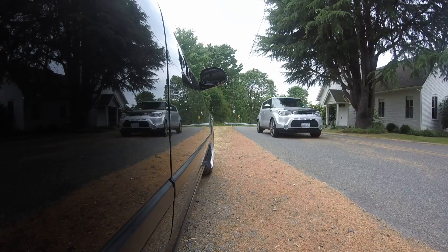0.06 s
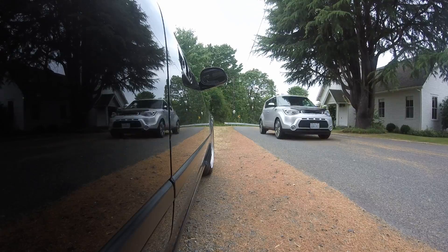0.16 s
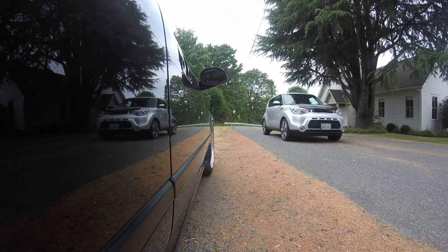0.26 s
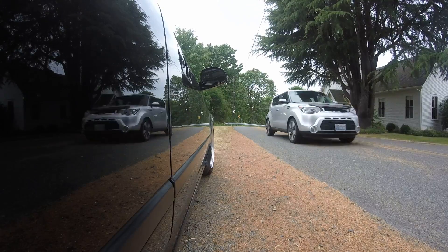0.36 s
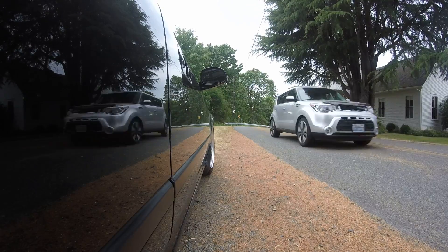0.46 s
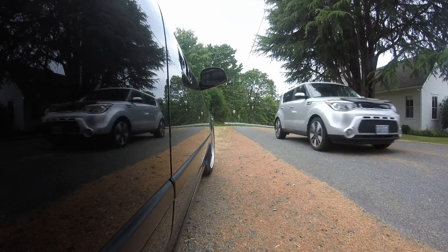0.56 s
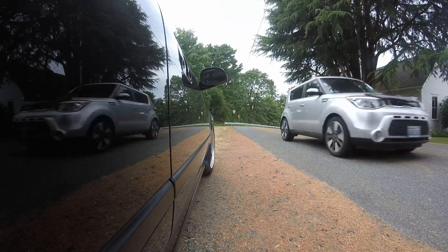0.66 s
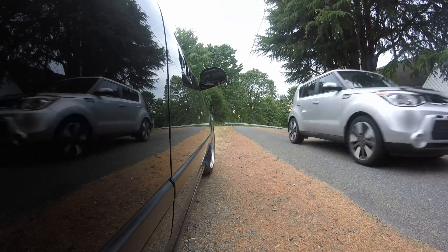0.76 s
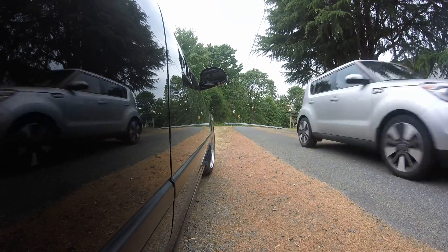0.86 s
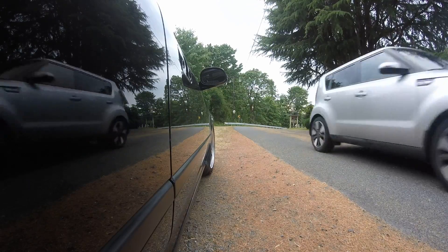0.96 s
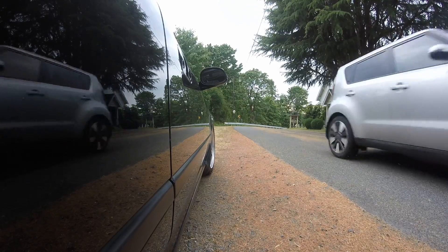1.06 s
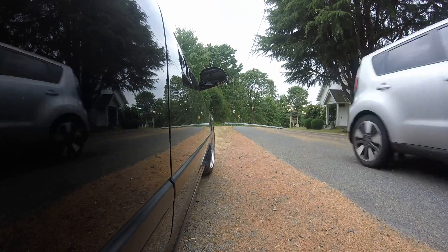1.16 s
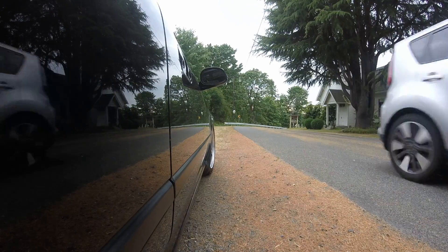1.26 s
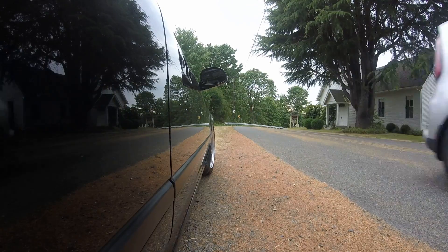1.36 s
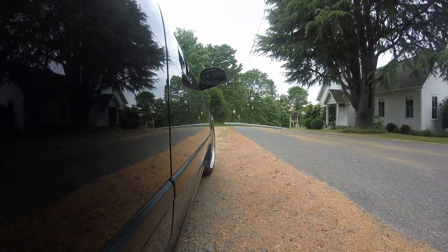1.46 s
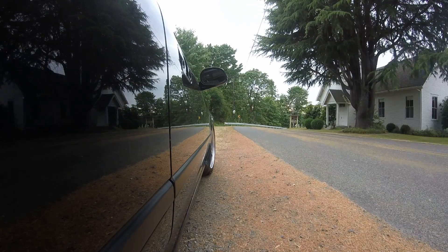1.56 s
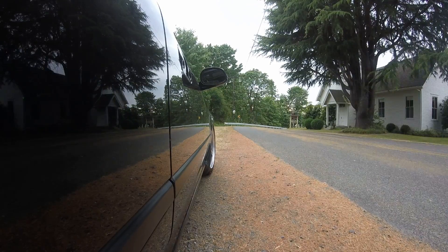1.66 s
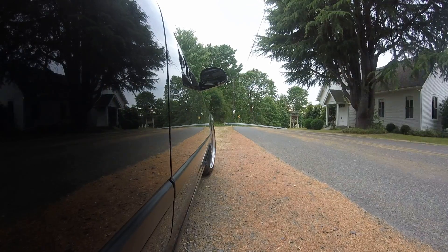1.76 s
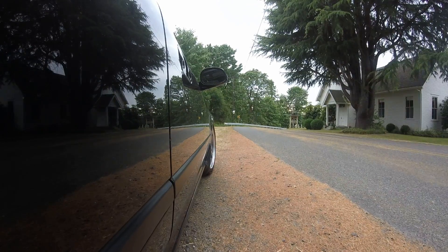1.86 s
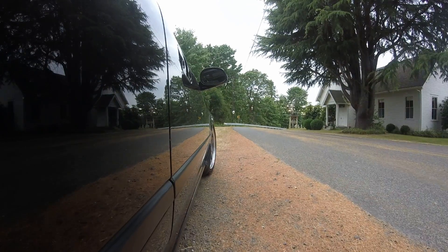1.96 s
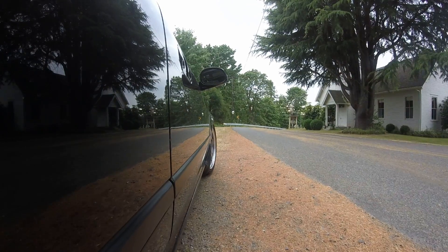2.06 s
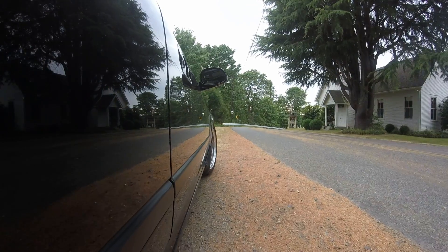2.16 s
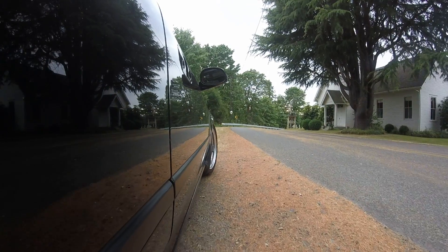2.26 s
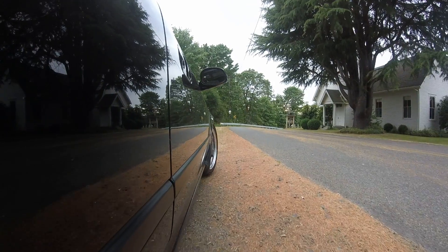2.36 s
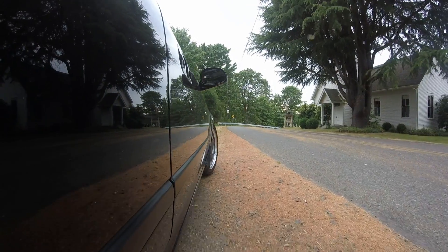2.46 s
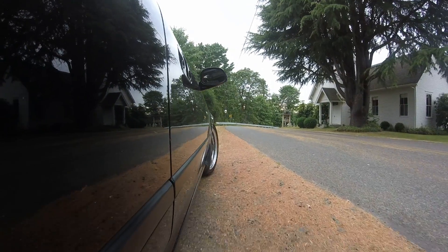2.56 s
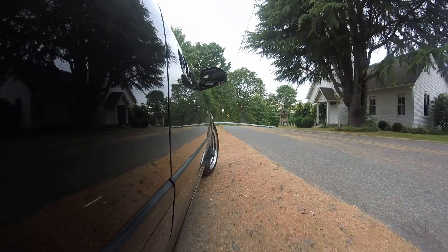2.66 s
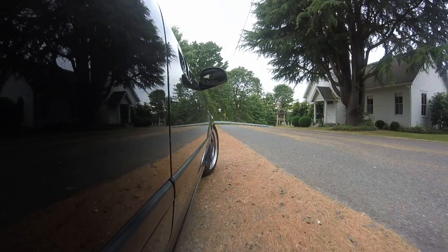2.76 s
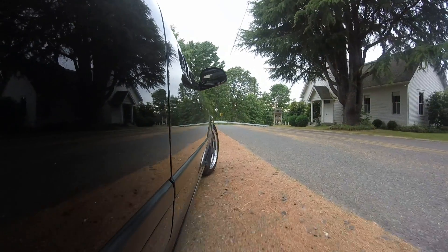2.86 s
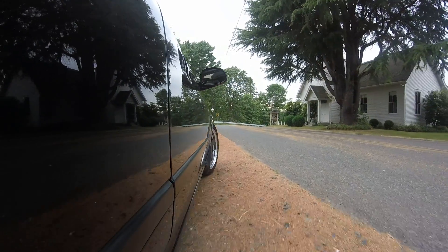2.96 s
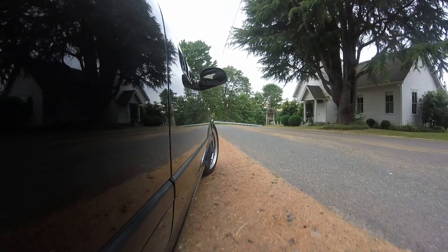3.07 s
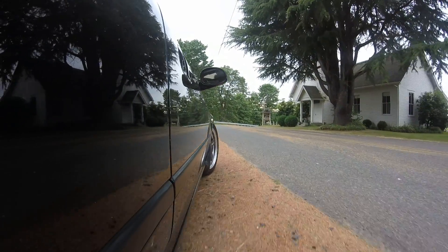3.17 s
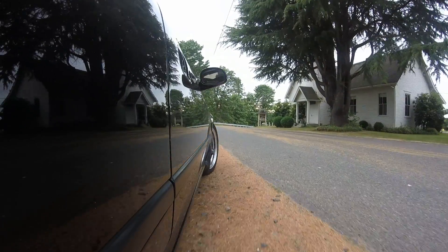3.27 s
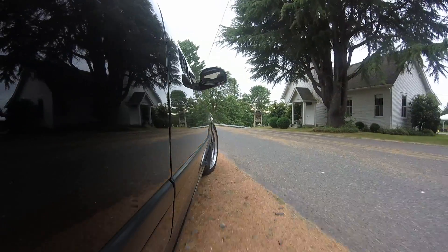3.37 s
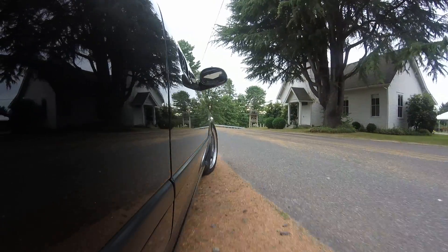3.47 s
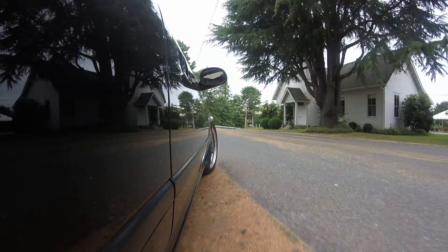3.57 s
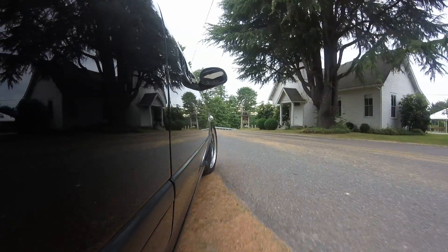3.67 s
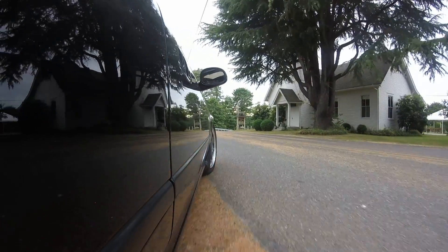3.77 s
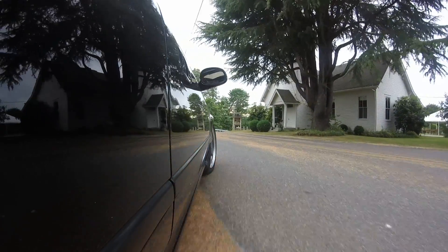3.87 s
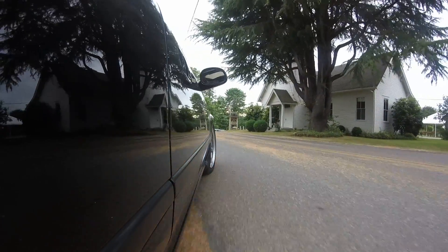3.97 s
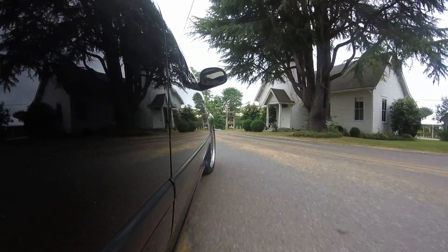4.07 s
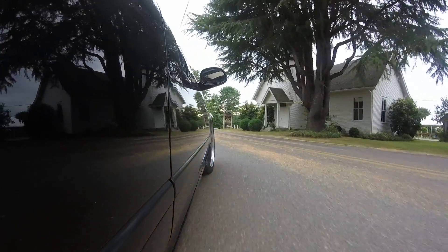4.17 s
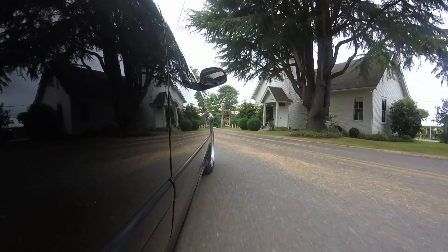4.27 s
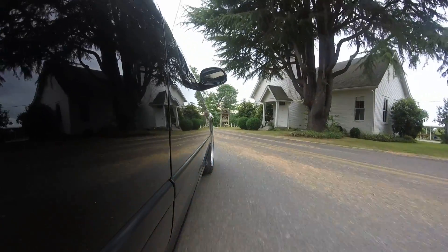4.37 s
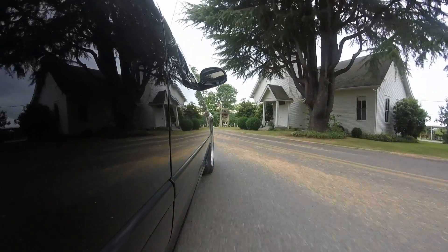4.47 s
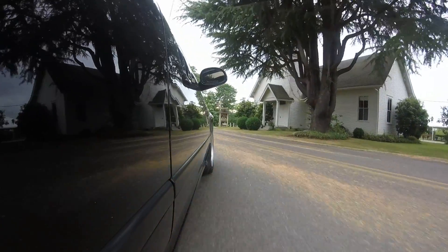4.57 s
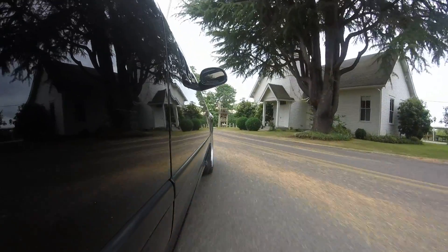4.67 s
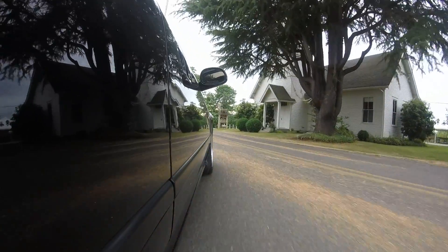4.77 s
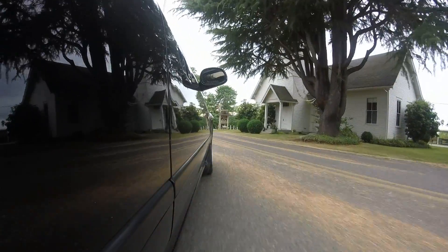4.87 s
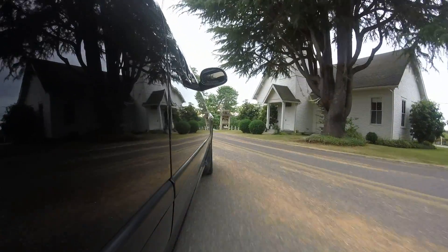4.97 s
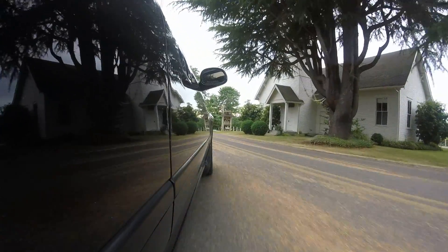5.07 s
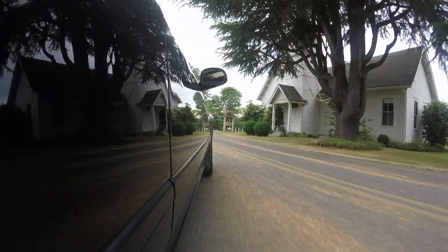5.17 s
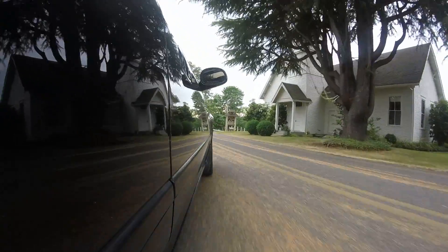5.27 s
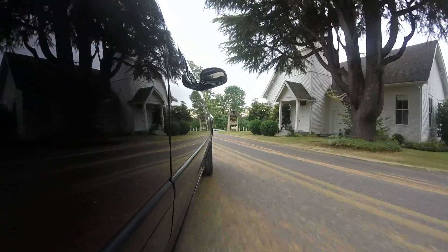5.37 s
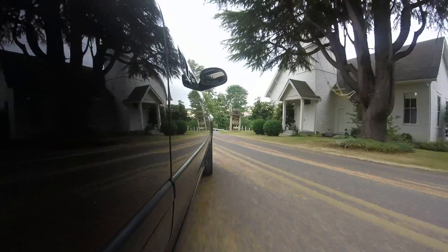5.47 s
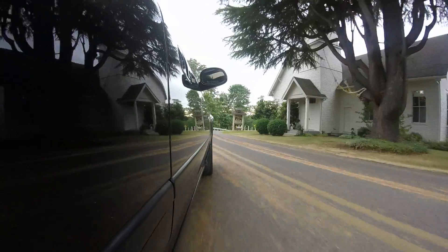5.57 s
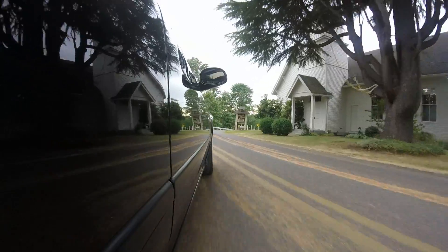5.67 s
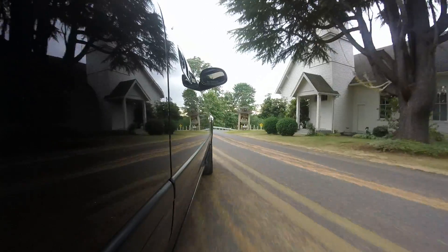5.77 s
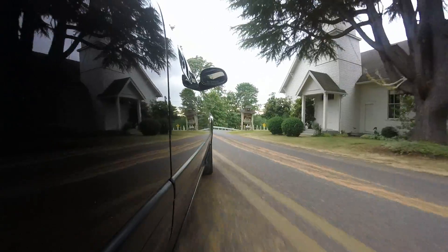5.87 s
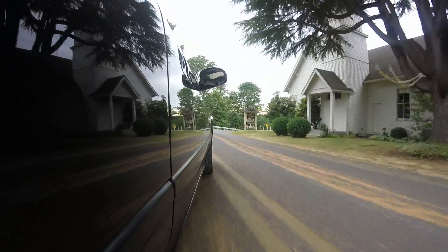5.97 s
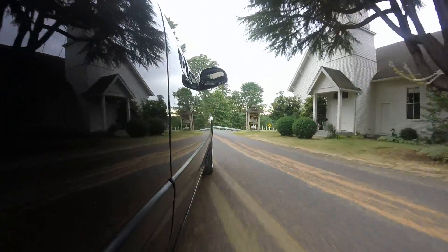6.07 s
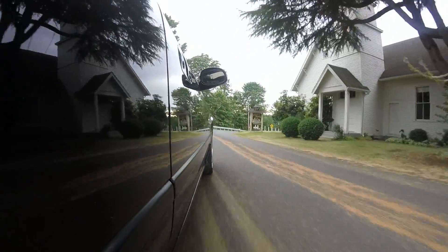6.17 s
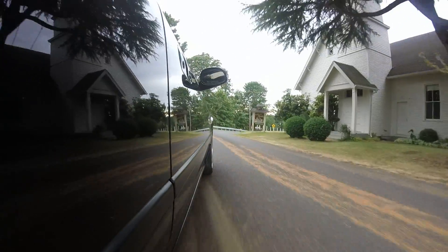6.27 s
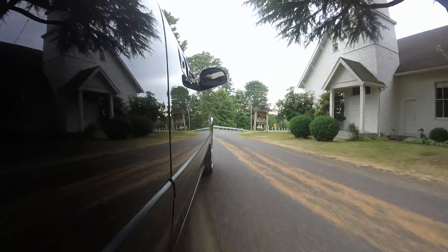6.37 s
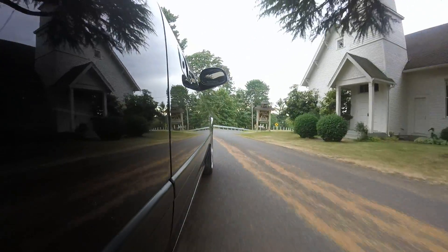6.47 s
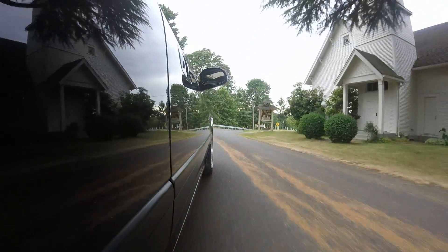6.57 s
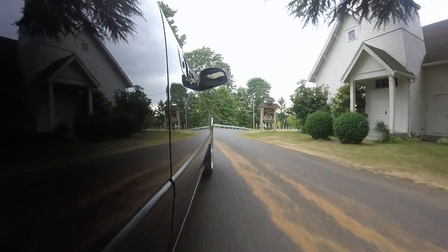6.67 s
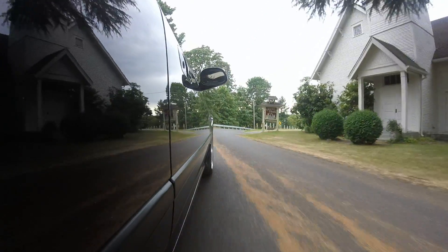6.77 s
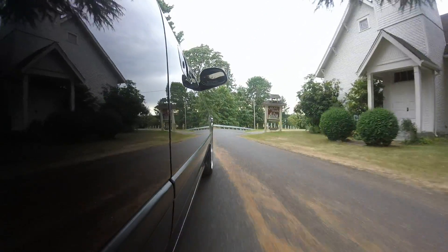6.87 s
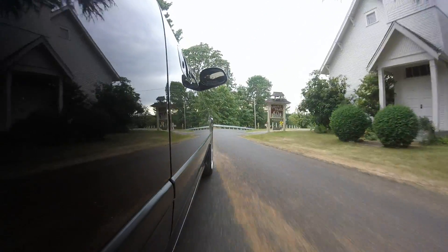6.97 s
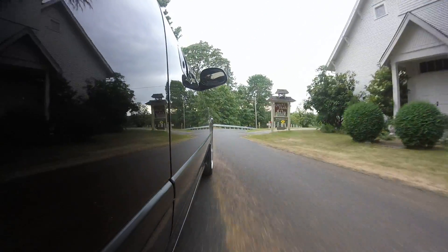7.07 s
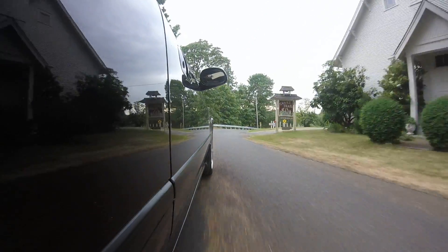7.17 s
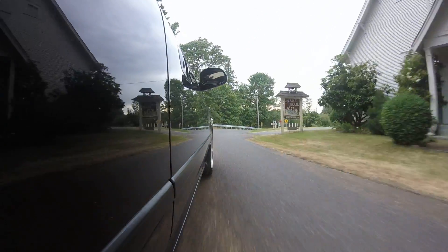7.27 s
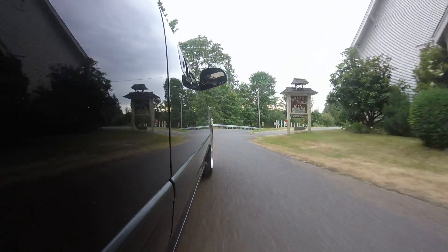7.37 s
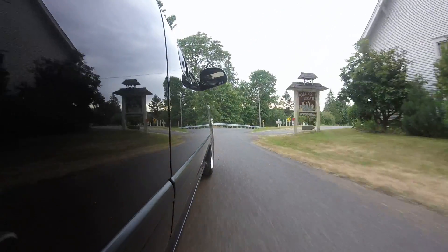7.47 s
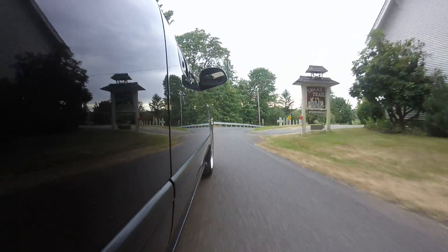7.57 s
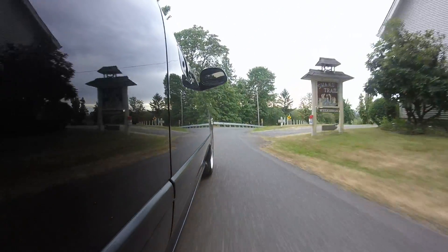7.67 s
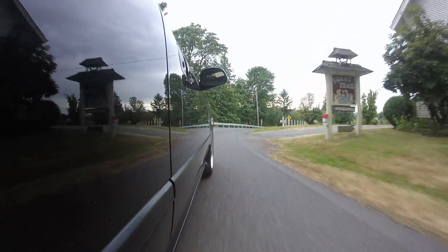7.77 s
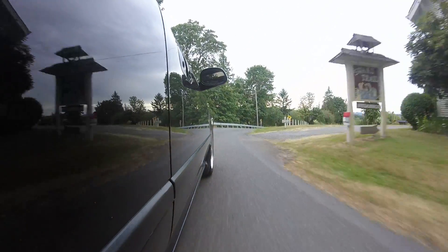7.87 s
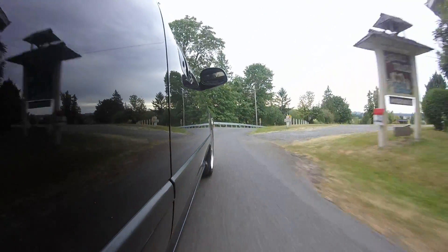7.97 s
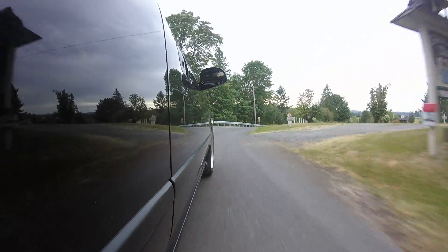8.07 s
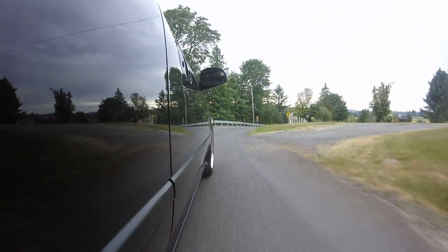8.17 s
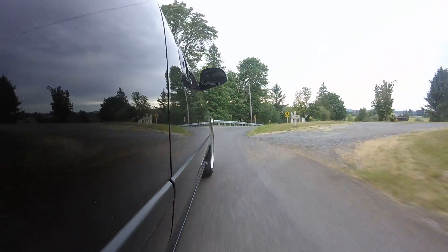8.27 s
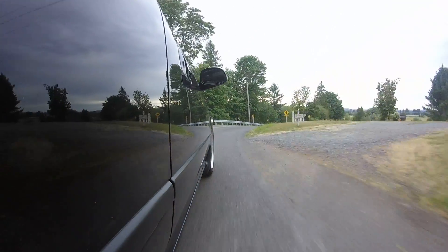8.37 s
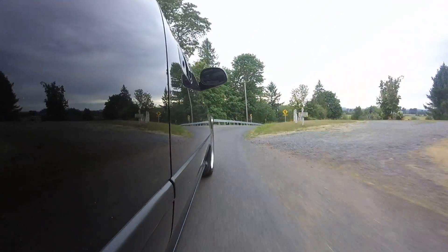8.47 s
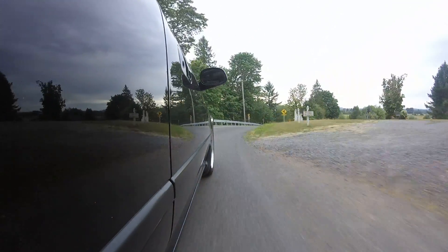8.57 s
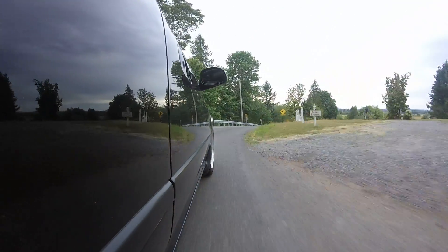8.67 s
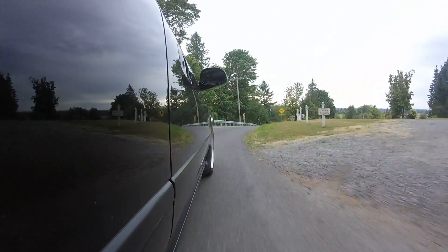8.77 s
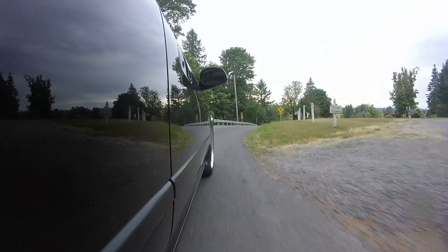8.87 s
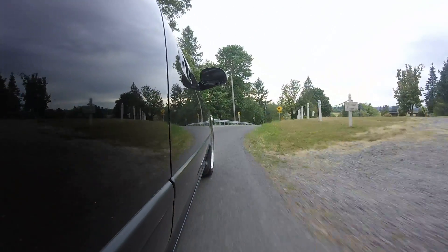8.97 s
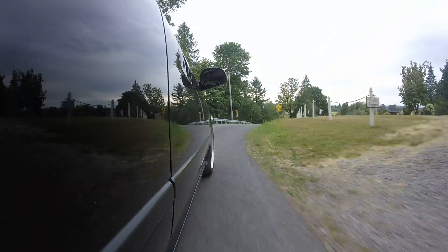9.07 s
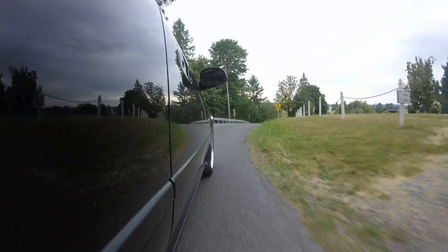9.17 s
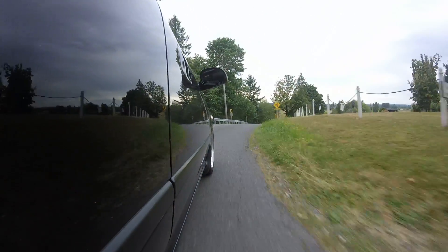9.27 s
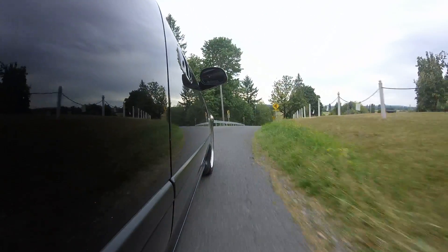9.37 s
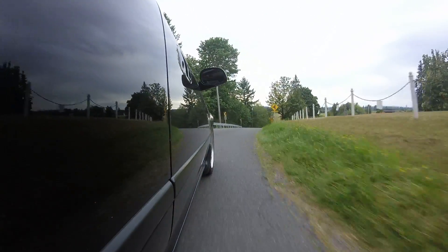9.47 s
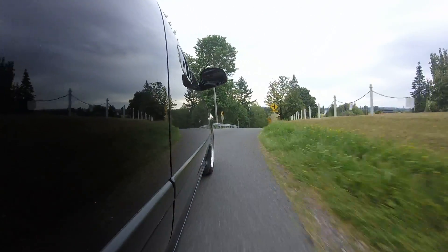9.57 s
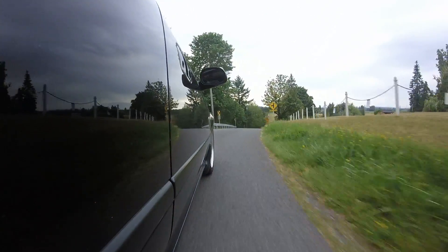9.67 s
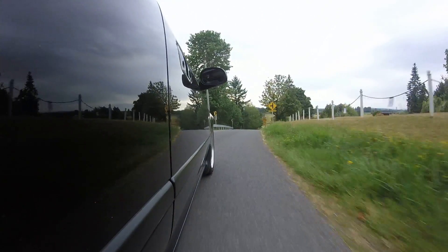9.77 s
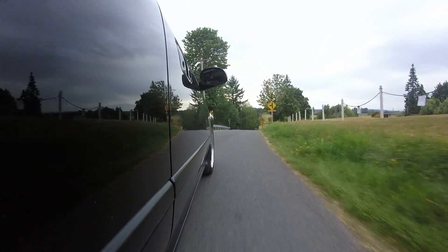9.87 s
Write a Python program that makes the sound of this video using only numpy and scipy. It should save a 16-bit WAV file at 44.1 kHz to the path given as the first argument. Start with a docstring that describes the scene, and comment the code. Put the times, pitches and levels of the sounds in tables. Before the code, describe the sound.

Quiet engine idling outdoors by a roadside, then a short rev and rumbling jolts. Dull stone ticks scatter under the car as it moves off, with two low knocks. The engine winds up through booming resonances into a raspy high drone, a loose mount buzzing briefly. Wind rushes over the enclosed, boxy side-mounted microphone with a thin whistle; finally the engine drops away under gusts, rumble and bright clicks.

```python
"""A car engine idles, revs, pulls away and is let off, heard inside a closed camera housing on the car's flank.
The engine is a stack of sine waves locked to its firings, made louder or softer by exhaust, body and housing.
The road shakes the body panel into two wavering hums and a rumble, under a broad tyre roar of filtered noise.
Wind noise rises over the housing, with a whistle. Stones and grit tick as short bursts, low knocks ring the
panel, and the loose mount buzzes in time with the firings. A steady hiss lies below."""
import sys
import numpy as np
from scipy import signal
from scipy.io import wavfile
from scipy.ndimage import uniform_filter1d

SR = 44100
rng = np.random.default_rng(int(sys.argv[2]) if len(sys.argv) > 2 else 0)


def master(y):
    """Save y as 16-bit WAV."""
    cut = np.clip(np.atleast_2d(y).T, -1, 1)
    pcm = np.round(cut * 32767)  # scale
    wavfile.write(sys.argv[1], SR, pcm.astype(np.int16))


N = 437472
T = np.arange(N) / SR  # time in seconds


def gain_of(db):
    """Turns decibels into a multiplying gain."""
    return 10 ** (np.asarray(db) / 20)


def evened(x):
    """Scales a sound to an rms of 1."""
    return x / np.sqrt(np.mean(x ** 2) + 1e-20)


def noise():
    """White noise of rms 1, as long as the scene."""
    return rng.standard_normal(N)


def columns(rows):
    """Draws straight lines between the rows of a table: one curve for each column after the time."""
    seconds, *rest = np.transpose(rows)
    return [np.interp(T, seconds, column) for column in rest]


def spans(rows, rise_s, fall_s):
    """Gain that fades in and out within each (start, end, dB) row and is zero elsewhere."""
    return sum(gain_of(db) * np.clip(np.minimum((T - start) / rise_s, (end - T) / fall_s), 0, 1)
               for start, end, db in rows)


def ringing(modes, hz):
    """Gain of a set of resonances at hz; their powers add."""
    powers = ((gain_of(db) / (1 + (2 * (hz - centre) / width) ** 2) ** 0.65) ** 2
              for centre, width, db in modes)
    return np.sqrt(sum(powers))


def read(points, hz):
    """Gain of a spectrum table at hz, in straight lines over the logarithm of frequency."""
    table_hz, db = np.transpose(points)
    return gain_of(np.interp(np.log(hz + 1), np.log(table_hz + 1), db))


def shaped(x, gain):
    """Filters x without pre-echo by a gain that depends on Hz; white noise keeps its overall level."""
    log_gain = np.log(gain(abs(np.fft.fftfreq(16384, 1 / SR))) + 1e-5)
    taps = np.fft.ifft(np.exp(np.conj(signal.hilbert(log_gain)))).real[:8192]
    return signal.oaconvolve(x, taps / np.linalg.norm(taps))[:N]


def wander(per_s):
    """Random wandering of rms 1, quicker for a higher per_s."""
    span = max(int(SR / 64 / per_s), 2)
    slow = rng.standard_normal(N // 64 + 1)  # one value every 64 samples
    for _ in range(2):
        slow = uniform_filter1d(slow, span)
    return np.interp(T, np.arange(len(slow)) * 64 / SR, evened(slow))


def train(times, db):
    """Single samples at the given times, to be given a sound by a filter."""
    out = np.zeros(N)
    np.add.at(out, np.clip((np.asarray(times) * SR).astype(int), 0, N - 1), gain_of(db))
    return out


# The engine's run. Each row: time in seconds, firing rate in Hz, load in dB, extra dB on orders 3 to 7.
ENGINE = [(0.0, 24.15, -47, -8), (0.05, 25.43, -40, -9), (0.5, 27.79, -39.5, -9),
          (1.19, 29.17, -38.5, -1.3), (1.3, 30.73, -40, -11), (1.41, 35.27, -39.5, 7.3),
          (1.6, 51.43, -32.5, -1.5), (1.79, 68.23, -35.5, -0.8), (2.02, 73.6, -35.5, 2),
          (2.18, 67.43, -35.5, -3.5), (2.4, 54.96, -41.5, 8), (2.62, 53.84, -33, 2.8),
          (2.9, 54.2, -41, 9.5), (3.26, 48.66, -34, -1), (3.65, 39.57, -30, -0.2), (3.81, 41.86, -34.5, 5),
          (3.98, 45.82, -40.5, 4), (4.34, 49.77, -29, -4), (4.61, 52.64, -34, 0), (5.03, 59.35, -43, 6.5),
          (5.14, 63.7, -37, 1), (5.22, 66.25, -29.5, -2), (5.47, 72.66, -26, -6.3),
          (5.66, 82.26, -28.5, -7.5), (5.8, 85.86, -26.5, -10.5), (6.02, 92.0, -33, -6),
          (6.3, 99.2, -30, -5.5), (6.57, 108.9, -30.7, -2.5), (6.77, 114.2, -32, 7.5),
          (6.9, 121.5, -26.5, 2.5), (7.07, 130.6, -25, -1), (7.21, 138.7, -30, 8.5),
          (7.45, 150.1, -29, 2.5), (7.71, 163.5, -33.5, 8), (7.9, 173.3, -34, 8.5),
          (8.04, 180.8, -27.5, 10), (8.15, 178.4, -35.5, 2), (8.26, 170, -33, -4.5), (8.34, 163.4, -32, 3),
          (8.56, 146.9, -30, -9), (8.76, 132.7, -29.5, 8), (8.95, 119.8, -27, -1.5),
          (9.23, 100.4, -28.5, 1.5), (9.45, 84.8, -37, 11), (9.67, 69.1, -32.5, -5), (9.92, 57.5, -35, -10)]


def firings():
    """Running count of firings: the firing rate added up over time."""
    return np.cumsum(columns(ENGINE)[0]) / SR


# How exhaust and body pass the whole orders on. Each row: frequency in Hz, gain in dB.
PATH = [(20.0, -13), (42.0, -4), (56.0, -6), (75.0, 0.1), (84.0, 3.5), (92.0, 14.5), (99.0, 16.5),
        (108.0, 7.5), (122.0, -4), (132.0, 6.5), (143.0, 13.5), (156.0, 10), (170.0, 7), (177.0, 5),
        (195.0, 6), (212.0, 2), (232.0, -7), (255.0, 0), (285.0, 1.3), (320.0, -8), (330, 3), (343, 7),
        (352, 9), (362.0, -11), (385.0, -2.2), (423.0, 8), (470.0, 1.5), (488, -4.5), (500, 7), (512, 11.5),
        (530.0, -14.5), (560.0, -3.5), (600.0, -9), (720, -4), (900, 2), (1060, 6), (1150, -16)]
# Dead spots where the paths cancel. Each row: centre in Hz, half width in Hz, gain at the centre in dB.
NULLS = [(124.2, 1.6, -12.5), (170.95, 1.3, -11.5)]


def passage(hz):
    """Gain of the way through exhaust and body, with its dead spots."""
    dead_spot_db = sum(db / (1 + ((hz - centre) / half_width) ** 2) for centre, half_width, db in NULLS)
    return read(PATH, hz) * gain_of(dead_spot_db)


# Strengths of whole firing orders 1 to 7, one value each in dB, relative to the load.
WHOLE_DB = [9, 0.72, -4, -10, -16, -21.5, -24]
# Further level of orders 4 to 7. Each row: time in seconds, level in dB.
UPPER = [(0, 1.5), (.55, 5.5), (1.2, 2.5), (1.6, -1), (2.4, -1), (3.7, 1.5), (4.9, -2), (5.3, 3.5),
         (5.9, 9), (6.3, 5.5), (6.9, -1.5), (7.3, -0.5), (7.7, 2), (8.1, -6.5), (8.4, 1), (9.92, -1)]
# Throttle shut: whole orders 2 to 7 drop. The three values: start and end in seconds, change in dB.
OVERRUN = (8.38, 9.5, -12.5)


def whole_orders():
    """Sines at 1 to 7 times the firing rate swell as they cross the booms of exhaust and body."""
    hz, load_db, extra_db = columns(ENGINE)
    upper_db, angle, out = columns(UPPER)[0], 2 * np.pi * firings(), 0
    start, end, change_db = OVERRUN
    shut_db = change_db * np.clip(np.minimum(T - start, end - T) / 0.074, 0, 1)
    for order, db in enumerate(WHOLE_DB, 1):
        drive_db = db + load_db + 1.2 * wander(25)
        if order > 1:
            drive_db = drive_db + shut_db
        if order > 2:
            drive_db = drive_db + extra_db
        if order > 3:
            drive_db = drive_db + upper_db + 2.2 * wander(9.1)
        path = np.repeat(passage(order * hz[::64]), 64)[:N]  # worked out every 64 samples
        out = out + path * gain_of(drive_db) * np.sin(order * angle + order)
    return np.sqrt(2) * out


# The other multiples of the firing rate. Each row: order, relative level in dB.
ORDER_DB = [(.5, -8.5), (1.5, -13.5), (2.5, 9), (3.5, 2), (4.5, 9.5), (5.5, 10.5), (6.5, 4), (7.5, -9.5),
            (8, 7), (8.5, -2), (9, 5.5), (9.5, -0.5), (10, 5.5), (10.5, -0.5), (11, 0.5), (11.5, 0.5),
            (12, 3.5), (12.5, -7), (13, -2), (13.5, 3), (14, -2)]
# Rasp: drive of the orders above 2 in this set. Each row: time in seconds, level in dB.
RASP = [(0, -66), (1.2, -65), (1.5, -57.5), (3.5, -60), (5.2, -60.5), (5.55, -57.5), (5.9, -53.5),
        (6.4, -52.5), (6.75, -44.5), (7.0, -52), (7.2, -38.5), (7.55, -39.5), (7.9, -28), (8.1, -36.5),
        (8.2, -54), (8.6, -53), (9.92, -69)]
# What the body panel rings with. Each row: centre in Hz, width in Hz, relative level in dB.
PANEL = [(34.36, 2.115, -17), (55.7, 9.2, 7.5), (94.9, 18.62, 10.5), (146, 29.6, 7), (188, 51.6, -11),
         (245, 110, -7), (346, 14, -3.5), (411, 77, -4.5), (507.8, 8.2, -4.5), (765, 530, -23.5),
         (890, 230, -24), (1026, 24, -16)]
# What the housing rings with. Each row: centre in Hz, width in Hz, relative level in dB.
HOUSING = [(1606, 83, 12.5), (1701, 160, 11.5), (1539, 175, 10), (2170, 130, 7.5), (2492, 248, 1),
           (3120, 400, -0.5), (3720, 266, -3.5), (6115, 420, -4.5), (7200, 3000, -43), (9700, 1000, -50.5)]
HALF_DB = 3.5  # orders .5 and 1.5 against the load


def rasp_orders():
    """Half orders from unequal cylinders, and whole ones from 8 up, swell on panel and housing modes."""
    hz, load_db, _ = columns(ENGINE)
    rasp_db, angle, out = columns(RASP)[0], 2 * np.pi * firings(), np.zeros(N)
    for order, db in ORDER_DB:
        coarse_hz = order * hz[::64]
        body = np.hypot(ringing(PANEL, coarse_hz), gain_of(-16.5) * ringing(HOUSING[:4], coarse_hz))
        drive_db = (rasp_db if order > 2 else load_db + HALF_DB)[::64] + db
        uneven_db = 2 * wander(7)[::64]  # the burn drifts
        level = np.repeat(body * gain_of(drive_db + uneven_db), 64)[:N]
        out += level * np.sin(order * angle + 2 * np.pi * rng.random())
    return np.sqrt(2) * out


def engine():
    """All sine waves locked to the firings, added together."""
    return whole_orders() + rasp_orders()


# Road shake. Each row: time in seconds, then dB of the 35 Hz hum, the 94 Hz hum, the rumble and the drone.
ROAD = [(0, -37.5, -58, -42, -54), (.5, -43, -43, -35.5, -58.5), (1.1, -50, -35.5, -48, -55.5),
        (1.4, -30, -36, -27, -52), (1.9, -22.5, -38.5, -44, -46.5), (2.5, -33, -28, -34, -46.5),
        (3.2, -24.5, -27.5, -46, -48), (3.9, -23, -29.5, -24.5, -47.5), (4.2, -33, -35.5, -29, -42),
        (4.6, -28, -39.5, -33, -51.5), (5.05, -26, -34, -29, -45.5), (5.35, -26, -41, -28.5, -31.5),
        (5.7, -22.5, -40.5, -33, -38.5), (6.1, -29, -29, -30.5, -39), (6.8, -34.5, -28, -38, -33.5),
        (7.2, -13.5, -27, -39, -32.5), (7.45, -29, -19.5, -27, -38.5), (7.7, -20, -36, -20.5, -30),
        (7.95, -29, -22, -24, -30), (8.17, -25, -26, -16, -29), (8.5, -18.5, -30, -28, -32),
        (9.1, -23.5, -23, -38, -32.5), (9.35, -24, -44, -30, -37), (9.92, -21, -39, -22.5, -34)]
# Jolts that swell the hums. Each row: centre in seconds, length in seconds, dB at 35 Hz, dB at 94 Hz.
JOLTS = [(1.659, 0.077, -42, -19), (2.516, 0.16, -40, -26.5), (2.76, 0.16, -29, -34),
         (2.96, .12, -40, -30.5), (3.231, 0.38, -37, -25), (3.66, .25, -23.5, -51), (4.25, 0.11, -26, -36),
         (4.679, 0.22, -21.5, -43.5), (5.169, .2, -28, -29.5), (6.18, .15, -45, -25.5),
         (6.7, 0.091, -28, -45), (6.86, 0.092, -33, -29), (7.297, .12, -25, -25.5), (7.91, .2, -18, -17),
         (8.233, 0.095, -26, -17.5), (8.51, .15, -31, -20), (9.024, .15, -35, -23),
         (9.56, 0.19, -17.5, -19.5), (9.831, 0.13, -16, -20.5)]


def hum(db, mode, column):
    """One panel mode kept humming by tyres and mounts, its pitch and level unsteady and swelled by jolts."""
    hz, width, _ = mode
    angle = 2 * np.pi * np.cumsum(hz + 0.287 * width * wander(5.43)) / SR
    jolts = sum(gain_of(peaks[column]) * np.exp(-(2 * (T - s) / length) ** 2) for s, length, *peaks in JOLTS)
    steady = gain_of(db + 1.7 * wander(15)) * np.hypot(.6, np.tanh(wander(5)))
    return np.sqrt(2) * np.hypot(steady, jolts) * np.sin(angle)


def road():
    """Shaking from tyres and mounts: two hums, and noise that rings the panel as rumble and drone."""
    low_db, boom_db, rumble_db, drone_db = columns(ROAD)
    out = hum(low_db, PANEL[0], 0) + hum(boom_db, PANEL[2], 1)
    for db, modes in ((rumble_db, PANEL[:4]), (drone_db, PANEL[4:9])):
        out += gain_of(db) * evened(shaped(noise(), lambda hz: ringing(modes, hz) ** 1.28))
    return out


# Tyre roar above the drone. Each row: time in seconds, level in dB.
TYRES = [(0, -58.5), (1.02, -65), (3, -59), (5.03, -63), (5.52, -56), (6.27, -58.5), (6.66, -47.5),
         (6.9, -41), (7.4, -50), (7.84, -52), (8.1, -46), (9.09, -46.5), (9.92, -48)]


def tyres():
    """A broad roar: noise carried by the panel's upper modes."""
    roar = shaped(noise(), lambda hz: ringing(PANEL[9:] + [(1440, 380, -18.0)], hz))
    return gain_of(columns(TYRES)[0]) * evened(roar)


def firing_puffs():
    """Steady noise with an extra burst at each firing that fades before the next."""
    return (1.2 + np.exp(-(firings() % 1) / 0.23) * gain_of(2.5 * wander(35))) * noise()


# Noise in the housing. Each row: time in seconds, engine chatter in dB, spitting of fine grit in dB.
AIR = [(0, -59.5, -81), (.94, -56.5, -71), (1.55, -50.5, -75), (2.1, -53, -77), (2.65, -53, -80),
       (3.01, -47, -79), (3.62, -53, -81), (4.3, -49.5, -75), (4.8, -53.5, -72.5), (5.5, -44.5, -69),
       (6.2, -47, -67), (6.52, -41, -77), (6.9, -37.5, -68), (7.21, -36.5, -63.5), (7.4, -31.5, -58),
       (7.73, -34, -53), (7.9, -27.5, -49.5), (8.29, -29, -42.5), (8.6, -34.5, -49.5), (9.06, -35.5, -57),
       (9.2, -34, -54), (9.39, -40, -58), (9.7, -34, -51), (9.92, -35.5, -57)]


def chatter():
    """Engine chatter: noise puffing with each firing rings the housing's lower modes."""
    puffs = shaped(firing_puffs(), lambda hz: ringing(HOUSING[:4], hz))
    return gain_of(columns(AIR)[0]) * evened(puffs)


# When the housing's narrow ring is heard. Each row: start in seconds, end in seconds, level in dB.
SING = [(.05, .4, -50), (.4, .66, -45.5), (1.27, 1.95, -46), (2.62, 3.3, -50), (3.9, 4.66, -49)]


def housing_ring():
    """Noise puffing with each firing rings two narrow modes of the housing, which come and go."""
    sing = shaped(firing_puffs(), lambda hz: ringing([(1595.5, 70, 0), (1714, 64, -3.5)], hz) ** 2)
    return spans(SING, 0.039, 0.039) * evened(sing)


# Wind over the housing. Each row: time in seconds, level in dB.
WIND = [(0, -67), (.77, -62.5), (2.24, -60), (3.86, -59.5), (5.11, -55), (5.41, -50), (6.3, -48.5),
        (6.55, -41), (7.04, -43), (7.2, -36.5), (7.52, -35.5), (7.93, -28), (8.4, -25.5), (8.7, -28),
        (9.2, -27), (9.36, -32.5), (9.73, -27), (9.92, -29.5)]


def wind(gusts):
    """Gusty noise coloured by the housing's middle modes."""
    rush = shaped(gusts * noise(), lambda hz: ringing(HOUSING[4:7], hz) ** 1.07)
    return gain_of(columns(WIND)[0]) * evened(rush)


WHISTLE_DB, WIND_REF_DB = -45.5, -28  # whistle level when the wind is at its reference level
WHISTLE_SLOPE, WHISTLE_FLOOR_DB = 1.4, -76.5  # dB of whistle per dB of wind, and its lowest level


def whistle(gusts):
    """The wind's 6 kHz whistle, narrow gusty noise that grows faster than the wind."""
    db = WHISTLE_DB + WHISTLE_SLOPE * (columns(WIND)[0] - WIND_REF_DB)
    tone = shaped(gusts * noise(), lambda hz: ringing(HOUSING[7:8], hz) ** 1.4)
    return gain_of(np.maximum(db, WHISTLE_FLOOR_DB)) * evened(tone)


# Colour of sharp cracks; each user softens it. Each row: frequency in Hz, relative level in dB.
CRACK = [(1060, -39), (1800, -4), (2520, 16.5), (2970, -6.5), (3930, 6.5), (6850, -9), (8440, -5),
         (13200, -36.5), (15800, -42.5)]


def grit(gusts):
    """Fine grit spits: some 600 random grains a second over noise, coloured by the housing's top modes."""
    sizes = gain_of(3.6 * np.minimum(rng.exponential(1, N), 3))
    grains = sizes * (rng.random(N) < 600 / SR) * rng.choice([-1, 1], N)
    spit = gusts * gain_of(1.8 * wander(40)) * (evened(grains) + 0.85 * noise())
    spit = shaped(spit, lambda hz: ringing(HOUSING[8:], hz) * read(CRACK, hz) ** 0.24)
    return gain_of(columns(AIR)[1]) * evened(spit)


def air():
    """The noises of the housing; wind, whistle and grit share the same gusts."""
    gusts = gain_of(0.83 * wander(14) + 1.91 * wander(110))
    return chatter() + housing_ring() + wind(gusts) + whistle(gusts) + grit(gusts)


# Dull ticks. Each row: start in seconds, level in dB before the colouring.
TICKS = [(1.3657, -48), (2.0151, -38), (2.175, -39), (2.1974, -35), (2.2836, -36), (2.8135, -33.5),
         (2.8527, -50), (2.9322, -40), (2.9444, -28.5), (3.0536, -33), (3.098, -45), (3.3098, -32),
         (3.3137, -20), (3.3222, -30), (3.3338, -31), (3.347, -34), (3.3966, -33.5), (3.501, -33),
         (3.564, -38), (3.615, -38), (3.688, -41), (3.722, -37), (3.7959, -38), (3.855, -37.5),
         (3.9127, -34), (3.983, -36), (4.0673, -31), (4.155, -42), (4.1919, -33.5), (4.2436, -34.5),
         (4.6148, -37), (6.1832, -32), (6.6472, -47), (6.6578, -34), (6.764, -50)]
# Colour of a dull tick. Each row: frequency in Hz, relative level in dB.
STONE = [(300, -44), (700, -19.5), (1000, -15), (1210, -22.5), (1660, 5.5), (1890, -11.5), (2370, -4),
         (2670, -24.5), (2990, -8), (3300, -15), (4160, -29.5), (9000, -65.5), (11700, -92.5),
         (19800, -120)]
TICK_T60_S = 0.028  # seconds to fall by 60 dB


def dull_ticks():
    """Stones strike the underbody: each a quickly fading burst of dull noise."""
    dull, t = np.zeros(N), T[:4000]
    for start, db in TICKS:
        at = round(start * SR)
        envelope = gain_of(db - 60 * t / TICK_T60_S) * np.minimum(t / 0.00032, 1)
        burst = envelope * rng.standard_normal(len(t))
        dull[at:at + len(t)] += burst[:N - at]
    return shaped(dull, lambda hz: read(STONE, hz))


# Treble clicks. Each row: start in seconds, level in dB before the colouring.
CLICKS = [(2.8811, -46.5), (3.4306, -49), (3.4481, -55), (4.0679, -57), (4.1914, -47), (4.2762, -49),
          (4.789, -48), (6.5451, -52), (6.5945, -54), (6.6075, -25.5), (6.6364, -42), (6.6457, -41),
          (6.66, -23), (6.7196, -46), (6.8518, -37), (7.1344, -50), (7.1818, -38), (7.2746, -37),
          (7.7268, -32), (8.0203, -24), (8.1257, -40), (8.4395, -41), (8.5722, -27), (8.6498, -31),
          (8.7849, -33), (8.8855, -26), (8.9306, -31), (8.9981, -28), (9.0962, -29), (9.1043, -29),
          (9.1833, -40), (9.2447, -28), (9.2565, -26), (9.2842, -25), (9.3157, -24.5), (9.3271, -29),
          (9.358, -36), (9.4544, -37), (9.5528, -36), (9.621, -37), (9.7445, -27), (9.7817, -28),
          (9.839, -34), (9.862, -29)]


def clicks():
    """Stones also click: one 7 ms snap of noise, repeated at each level and kept above 2200 Hz."""
    snap = rng.standard_normal(300) * gain_of(-60 * T[:300] / .007)
    sharp = signal.oaconvolve(train(*np.transpose(CLICKS)), snap)[:N]
    return shaped(sharp, lambda hz: read(CRACK, hz) ** .4 * (hz > 2200))


# Low knocks. Each row: start in seconds, level in dB before the ring's rise and decay.
KNOCKS = [(4.136, -28.5), (4.324, -33)]
KNOCK_HZ, KNOCK_T60_S = 434, 0.11  # pitch in Hz, seconds to fall by 60 dB


def knocks():
    """Short blows on one mode of the panel: a sine that rises fast and dies away."""
    t = T[:8000]
    envelope = np.minimum(t / 0.0051, 1) * gain_of(-60 * t / KNOCK_T60_S)
    ring = envelope * np.sin(2 * np.pi * KNOCK_HZ * t)
    return signal.oaconvolve(train(*np.transpose(KNOCKS)), ring)[:N]


# When the mount buzzes. Each row: start in seconds, end in seconds, relative level in dB.
BUZZ = [(6.312, 6.515, -41), (6.519, 6.545, -40), (6.56, 6.58, -50), (9.245, 9.335, -39.5)]


def buzz():
    """The loose mount knocks twice a firing, hard then soft, and rattles in between."""
    turns = 2 * firings()
    count = turns.astype(int)
    size = gain_of(3 * rng.uniform(-1, 1, count[-1] + 1))[count]  # each knock differs
    size = size * np.where(count % 2, .35, 1)
    knocking = .45 + 3.2 * size * np.exp(-(turns % 1) / .22)
    rattle = spans(BUZZ, .003, .008) * gain_of(1.2 * wander(60)) * knocking * noise()
    return shaped(rattle, lambda hz: read(CRACK, hz) ** 0.7)


def scene():
    """All sources at the one microphone."""
    return (engine() + road() + tyres() + air() + dull_ticks() + clicks() + knocks() + buzz())[None]


# The microphone port dulls the top. Each row: frequency in Hz, gain in dB.
PORT = [(100, -1.5), (9500, -1.5), (11000, -4.5), (13000, -4.5), (15500, -13.5)]


def port_gains():
    """Frequencies in Hz and gains of the microphone port."""
    hz = np.linspace(0, SR / 2, 65)
    return hz, read(PORT, hz)


# Colour of the hiss. Each row: frequency in Hz, relative level in dB.
HISS = [(120, -49.5), (200, 7), (249, -8.5), (408, -1.5), (879, -12), (1610, -14), (2000, -38), (3280, -16),
        (9820, -29.5), (15800, -47)]
HISS_DB, EDGE_HZ = -58.5, 15700  # hiss rms before the band limit, and that limit in Hz


def record(dry):
    """The microphone port, a steady floor of hiss, then the band limit."""
    heard = signal.oaconvolve(dry, signal.firwin2(255, *port_gains(), fs=SR)[None], "same")
    heard = heard + gain_of(HISS_DB) * shaped(noise(), lambda hz: read(HISS, hz))
    low_pass = signal.firwin(511, EDGE_HZ, window=("kaiser", 9), fs=SR)
    return signal.oaconvolve(heard, low_pass[None], "same")


dry = scene()
out = record(dry)
master(out)
```